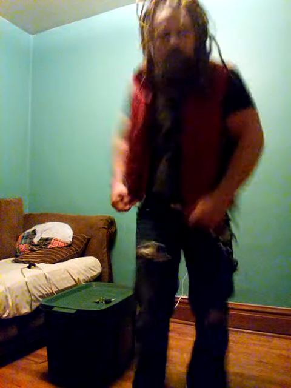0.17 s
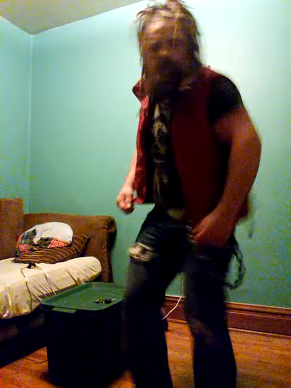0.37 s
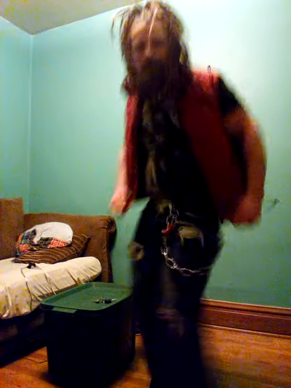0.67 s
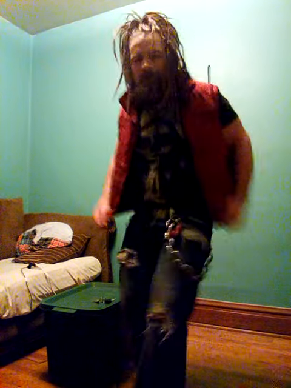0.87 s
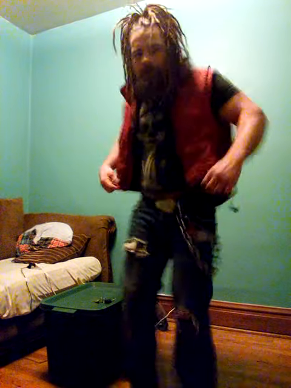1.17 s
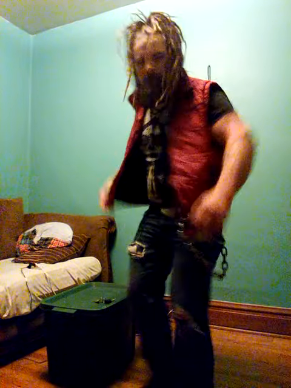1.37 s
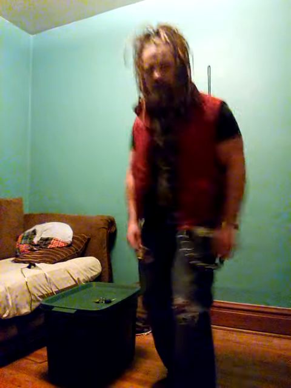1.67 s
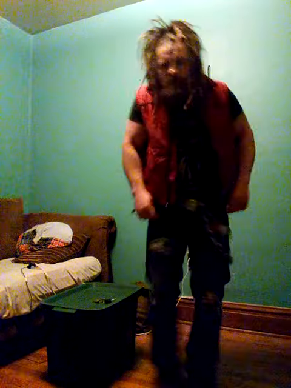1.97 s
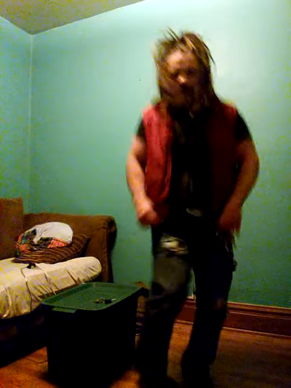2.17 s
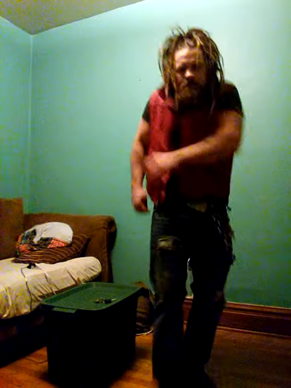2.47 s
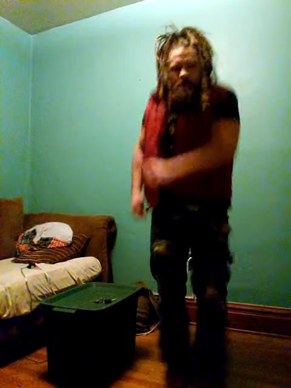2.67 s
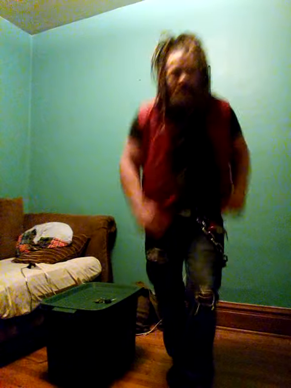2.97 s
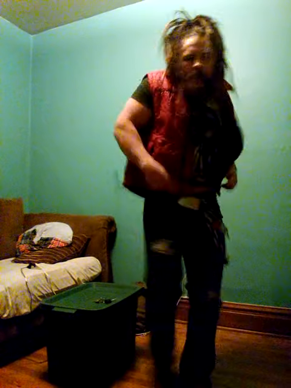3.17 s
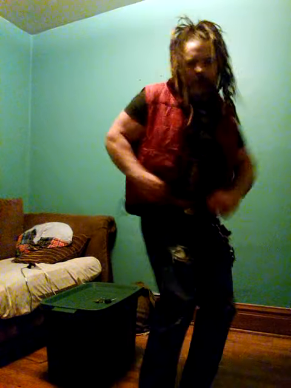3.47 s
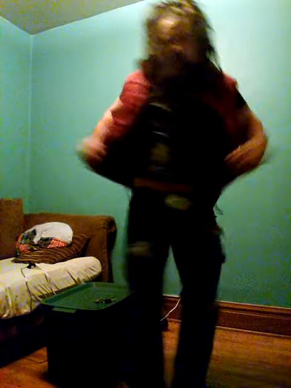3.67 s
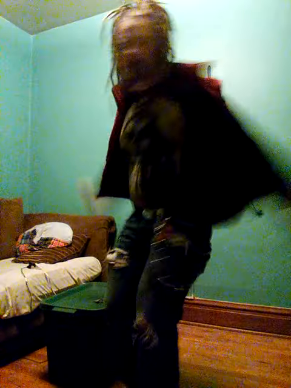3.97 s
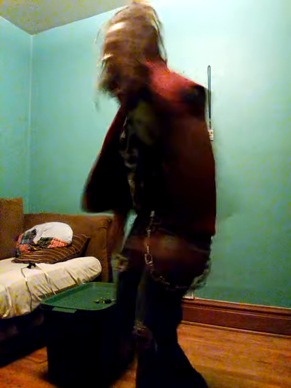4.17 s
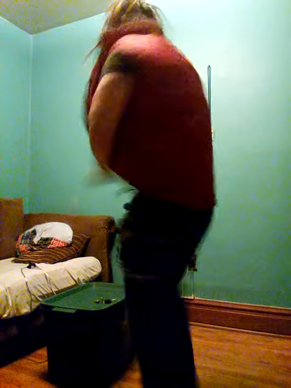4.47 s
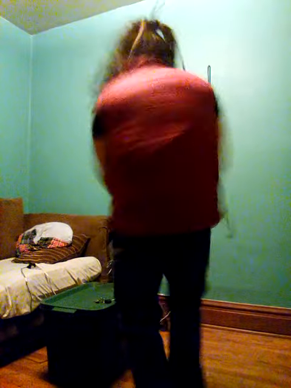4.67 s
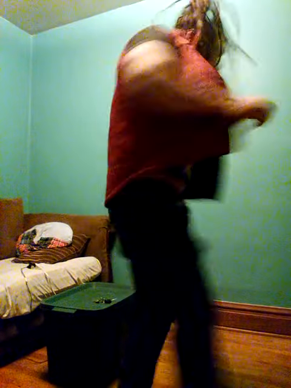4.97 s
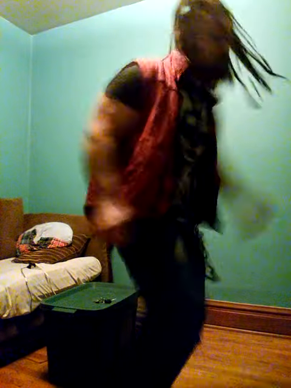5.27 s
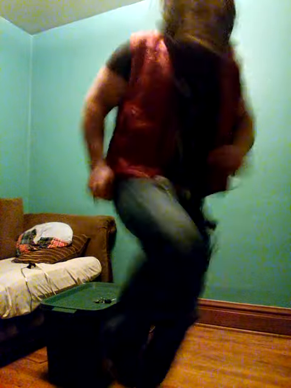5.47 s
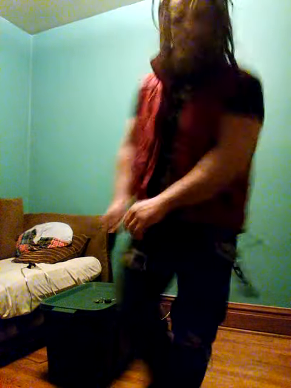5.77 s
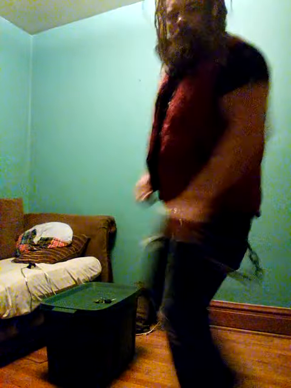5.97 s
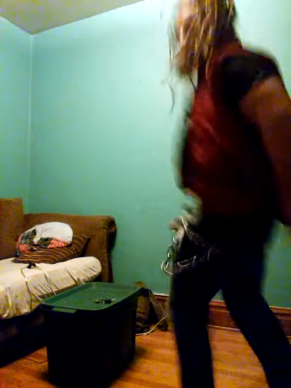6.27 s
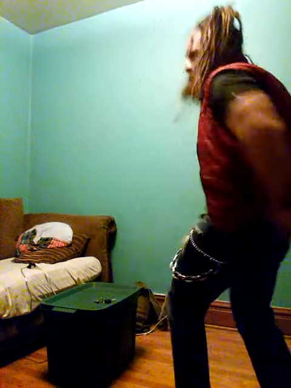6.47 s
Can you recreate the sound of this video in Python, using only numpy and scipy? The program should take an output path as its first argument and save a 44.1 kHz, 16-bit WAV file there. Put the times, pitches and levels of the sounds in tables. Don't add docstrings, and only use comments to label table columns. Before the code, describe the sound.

Quick dancing footwork on a wooden floor: dry, sandy scrapes and hisses run into one another with uneven gaps, the boards murmuring underneath. The strongest strokes come in the first half; later ones are lighter. Muffled heel bumps accompany turns, thin high metal links jingle at the hip, and brittle pebble clicks cluster at the end. Short room echo, quiet air and barely audible mains hum, picked up in stereo by a small handheld device's microphones.

```python
import sys
import numpy as np
from scipy import signal
from scipy.fft import rfft, irfft
from scipy.io import wavfile
from scipy.ndimage import uniform_filter1d

SR = 44100
rng = np.random.default_rng(int(sys.argv[2]) if len(sys.argv) > 2 else 0)


def how_loud(loudness_db):
    steps = np.asarray(loudness_db, float) / 20
    return 10 ** steps


def output_pcm(signal):
    pcm = np.clip(np.atleast_2d(signal).T, -1, 1) * 32767
    wavfile.write(sys.argv[1], SR, np.round(pcm).astype(np.int16))


N = 291942
CONTROL_STEP = 64

# f/Hz, level/dB (per Hz)
GRIT_SPECTRUM = [(600, -16.5), (1300, -6.5), (2200, -4.5), (3500, -4.5), (4800, 0), (6300, -4),
                 (7500, -14.5), (9000, -52)]
# f/Hz, level/dB (per Hz)
DUST_SPECTRUM = [(5500, -2), (7500, -1), (10000, 0.5), (14000, -5), (16000, -22)]


def rms_one(x):
    return x / np.sqrt(np.mean(x ** 2) + 1e-20)


def colour(x, spectrum):
    hz, db = np.transpose(spectrum)
    bins_hz = np.maximum(np.fft.rfftfreq(4096, 1 / SR), 1)
    log_gain = np.log(how_loud(np.interp(np.log(bins_hz), np.log(hz), db)))
    cepstrum = irfft(log_gain)
    cepstrum[1:2048] *= 2
    cepstrum[2049:] = 0
    impulse_response = irfft(np.exp(rfft(cepstrum)))[:2048]
    return signal.fftconvolve(x, impulse_response)[:N]


def unit_colour(x, spectrum):
    impulse_response = colour(np.ones(1), spectrum)
    return colour(x, spectrum) / np.sqrt(np.sum(impulse_response ** 2))


def drift(hz):
    r = np.exp(-2 * np.pi * hz / SR)
    wander = signal.lfilter([1], [1, -2 * r, r * r], rng.standard_normal(N + SR))
    return rms_one(wander[SR:])


def ring(clicks, hz, t60):
    r, w = how_loud(-60 / (t60 * SR)), 2 * np.pi * hz / SR
    return signal.lfilter([0, np.sin(w)], [1, -2 * r * np.cos(w), r * r], clicks + 1e-18)


def grains(per_s, spread_db):
    sizes = how_loud(spread_db * np.minimum(rng.exponential(1, N), 5))
    signed = sizes * rng.choice([-1, 1], N)
    return rms_one(signed * (rng.random(N) < per_s / SR))


def two_ports(shared, apart):
    short_waves = signal.butter(2, 1010, "high", fs=SR, output="sos")
    apart = 1.1 * signal.sosfilt(short_waves, apart) + .2 * np.roll(apart, SR // 50)
    return np.array([shared + apart, shared - apart])


def diffuse(catches, spectrum, t60):
    r = how_loud(-120 / (t60 * SR))
    trail = np.sqrt(signal.lfilter([1 - r], [1, -r], catches ** 2))
    fields = [unit_colour(trail * rng.standard_normal(N), spectrum) for k in range(2)]
    return two_ports(*fields) / np.sqrt(2)


def every_sample(*controls):
    return [np.interp(np.arange(N), np.arange(0, N, CONTROL_STEP), c) for c in controls]


def stroke(s, db, swell_s, sink_s, hold_s=0, last_db=None):
    lift_after_s, lift_s = .12, .14
    t = np.arange(0, N, CONTROL_STEP) / SR - s
    last_db = db if last_db is None else last_db
    held_db = np.interp(t, [0, hold_s + 1e-4], [db, last_db])
    swelling = np.minimum(t, 0) / swell_s
    sinking = np.maximum(t - hold_s, 0) / sink_s
    lifted = np.maximum(t - hold_s - lift_after_s, 0) / lift_s
    return how_loud(2 * held_db + 40 * (swelling - sinking - lifted)) + 1e-12


def slide():
    # t/s at full speed, grit level/dB, swell/s and sink/s per 20 dB, weight on boards/dB
    scuffs = [(.15, -18, .14, .08, 1), (.29, -28, .14, .24, 1), (.53, -38, .12, .3, 7),
              (.64, -38, .12, .1, 1), (.73, -19, .1, .12, -1), (1.2, -15, .09, .14, 0),
              (1.66, -17, .09, .085, 3), (2.03, -15, .08, .19, -3), (2.59, -17.5, .065, .3, 0),
              (2.86, -27, .3, .15, 11), (3.235, -32, .08, .1, -1), (3.5, -21, .11, .14, 2),
              (3.92, -20, .04, .38, -1), (4.23, -30, .2, .2, 1), (4.54, -23.5, .04, .2, 2),
              (4.98, -29.5, .075, .3, -2), (5.2, -33.5, .4, .17, 0), (5.615, -29.5, .1, .16, -1),
              (5.795, -40, .03, .12, 4), (6.06, -26, .08, .11, 3), (6.225, -37.5, .02, .16, -1),
              (6.49, -36, .15, .3, -1)]
    # start t/s, length/s, first level/dB, last level/dB, weight on boards/dB
    drags = [(0, .05, -34.5, -33, -2), (.78, .29, -27, -42, 2), (1.36, .24, -35, -28, 0),
             (1.84, .08, -55, -47, -2), (2.29, .145, -37, -27, -2), (2.68, .42, -25, -36, 0),
             (3.32, .14, -31, -27, -3), (3.68, .09, -46, -44, 10), (3.84, .08, -28, -20, -2),
             (4.455, .085, -30, -24, -2), (4.66, .16, -42, -47, 0), (5.36, .18, -41, -42, 0),
             (6.35, .08, -46, -43, -3), (6.54, .08, -42, -41, 14), (4.36, .04, -50, -50, 4)]
    drag_start_s, drag_stop_s = .03, .08
    boards_ref_db, boards_follow = -17.5, .6
    dust_ref_db, dust_follow = -22, .8
    dust_lifts_db, dust_loss = -41, 1.5
    dust_lead_s, dust_pinned = .012, .7

    moves = [(stroke(s, db, swell, sink), weight) for s, db, swell, sink, weight in scuffs]
    moves += [(stroke(s, db, drag_start_s, drag_stop_s, hold, last), weight)
              for s, hold, db, last, weight in drags]
    power = sum(move for move, weight in moves)
    grit_db = 10 * np.log10(power)
    weight_db = sum(move * weight for move, weight in moves) / power
    swing_db = grit_db + 30
    boards_db = boards_ref_db + weight_db + (boards_follow - 1) * swing_db

    slope_db_per_s = np.gradient(uniform_filter1d(grit_db, size=20)) * SR / CONTROL_STEP
    speeding_db = np.clip(dust_lead_s * slope_db_per_s, -3.0, 4.0)
    thinning_db = dust_loss * np.minimum(grit_db - dust_lifts_db, 0)
    dust_db = dust_ref_db + (dust_follow - 1) * swing_db + thinning_db + speeding_db - dust_pinned * weight_db
    return every_sample(grit_db, boards_db, dust_db)


def soles():
    # f/Hz, level/dB (per Hz)
    boards_spectrum = [(150, -14.5), (300, -10.5), (500, 1), (800, 3), (1100, -.5), (1500, -12),
                       (4000, -18), (10000, -40)]
    grit_db, boards_db, dust_db = slide()
    slip = how_loud(grit_db + 1.0 * drift(35) + 1.12 * drift(250))
    catches = grains(6000, spread_db=2.0)
    grit = slip * how_loud(-8.0) * catches
    boards_drive = rms_one(catches + 2.0 * rng.standard_normal(N))
    boards = slip * how_loud(boards_db - 1.5) * boards_drive
    dust = slip * how_loud(dust_db + 3.0) * grains(9000, spread_db=3.0)

    hiss_echoes = diffuse(grit, GRIT_SPECTRUM, 0.23) + diffuse(dust, DUST_SPECTRUM, 0.14)
    echoes = how_loud(-0.5) * hiss_echoes + how_loud(-2.5) * diffuse(boards, boards_spectrum, 0.25)
    hiss = unit_colour(grit, GRIT_SPECTRUM) + unit_colour(dust, DUST_SPECTRUM)
    return hiss, unit_colour(boards, boards_spectrum), echoes


def sway():
    # t/s, joists level/dB, whole floor level/dB
    shifts = [(0, -49, -56), (.08, -57, -49), (.27, -48, -54), (.4, -54, -55), (.6, -51, -64),
              (.77, -47, -59), (.97, -51, -53), (1.25, -47, -63), (1.5, -50, -62), (1.7, -51, -44),
              (2.04, -51, -66), (2.33, -54, -57), (2.88, -38, -63), (3.06, -46, -58), (3.2, -52, -51),
              (3.52, -47, -66), (3.72, -49, -56), (3.93, -51, -58), (4.12, -52, -53), (4.31, -49, -50),
              (4.67, -51, -58), (4.85, -58, -53), (5.14, -46, -75), (5.36, -49, -60), (5.55, -62, -49),
              (5.8, -68, -47), (6.0, -51, -50), (6.25, -48, -48), (6.38, -60, -45), (6.6, -43, -52)]
    load_s, unload_s = .13, .15
    loads = np.array([stroke(s, 0, load_s, unload_s) for s, *levels in shifts])
    powers = how_loud(2 * np.array(shifts)[:, 1:].T)
    return every_sample(*10 * np.log10(powers @ loads))


def floor_weight():
    # f/Hz, level/dB (per Hz)
    joists_spectrum = [(70, -18.5), (110, 2), (170, 7), (230, 1), (330, 3), (420, -3), (600, -28),
                       (4000, -45)]
    floor_hz, floor_t60_s = 61, 0.26
    joists_db, floor_db = sway()
    joists = rms_one(colour(rng.standard_normal(N), joists_spectrum))
    floor = ring(rng.standard_normal(N), floor_hz, floor_t60_s)
    floor = rms_one(ring(floor, floor_hz, floor_t60_s))
    return how_loud(joists_db - 4.0) * joists + how_loud(floor_db - 4.0) * floor


def still_air():
    # f/Hz, level/dB (per Hz)
    air_spectrum = [(25, -40), (42, -26), (60, -6.5), (120, 3), (250, -13), (700, -6), (1500, -9),
                    (5000, -18.5), (8000, -45), (15000, -50)]
    fields = [how_loud(-57) * rms_one(colour(rng.standard_normal(N), air_spectrum)) for k in range(2)]
    return two_ports(*fields)


def steady_hum():
    # f/Hz, level/dB (rms)
    tones = [
        (60, -79.5),
        (171, -70),
    ]
    t = np.arange(N) / SR
    return sum(np.sqrt(2) * how_loud(db + 0.83 * drift(5.6)) * np.sin(2 * np.pi * hz * t) for hz, db in tones)


def chains():
    # t/s, peak level/dB, rattle t60/s
    shakes = [(0.8969, -44, 0.2), (1.5833, -54, 0.18), (1.6965, -50, 0.15), (4.1091, -47, 0.2),
              (4.143, -49, 0.2), (4.1794, -56, 0.2), (4.2722, -39, 0.2), (4.8249, -55, 0.13),
              (5.2505, -54, 0.2), (5.2754, -51, 0.2), (5.3547, -55, 0.2), (5.4076, -33, 0.22),
              (5.4864, -39, 0.2), (5.5737, -43, 0.23), (5.6456, -51, 0.18), (5.7862, -53, 0.22),
              (5.9723, -49, 0.2), (6.2218, -37, 0.17), (6.2477, -49, 0.15), (6.3669, -47, 0.22),
              (6.3889, -40, 0.2), (6.4547, -39, 0.12)]
    # f/Hz, level/dB, t60/s
    link_modes = [(8070, -30, 0.075), (8420, -54, .1), (8980, -19, .1), (10000, -36, .06),
                  (12800, -24, .06), (14170, -4, 0.073), (14240, -1, .08), (14330, 9, .07),
                  (14700, -23, .07), (14300, 1, 0.059), (14750, -9, .05), (15150, -6, .05),
                  (15300, -4, .06), (15100, -3, .06)]
    t, shake = np.arange(N) / SR, np.zeros(N)
    for s, db, t60 in shakes:
        span = slice(round(s * SR), round(s * SR) + SR // 2)
        since = t[span] - s
        shake[span] += (1 - np.exp(-since / 0.0027)) * how_loud(db - 60 * since / t60)
    touches = shake * grains(1500, spread_db=-1.0)
    ringing = sum(how_loud(db) * ring(touches * rng.standard_normal(N), hz, 0.38 * t60)
                  for hz, db, t60 in link_modes)
    return how_loud(-27.0) * ringing + how_loud(-17.0) * colour(touches, DUST_SPECTRUM)


def far_engine():
    # t/s, f/Hz, level/dB (rms)
    glide = [
        (0.9, 77.3, -63),
        (1.55, 83.5, -54),
        (1.782, 86.2, -60),
        (2.388, 91, -59),
        (2.5, 90.1, -71),
    ]
    t = np.arange(N) / SR
    times, pitches, levels = np.transpose(glide)
    hz, db = np.interp(t, times, pitches), np.interp(t, times, levels)
    fade = np.clip(np.minimum(t - times[0], times[-1] - t) / 0.16, 0, 1)
    return np.sqrt(2) * how_loud(db) * fade * np.sin(2 * np.pi * np.cumsum(hz) / SR)


def heel_thuds():
    # t/s, peak level/dB, f/Hz, t60/s
    blows = [(1.269, -49, 264, 0.16), (1.679, -41, 70.0, 0.15), (1.997, -46, 113, 0.15),
             (2.85, -44, 480, .12), (2.87, -47, 150, 0.15), (6.53, -47, 492, .2),
             (3.039, -41.5, 168.6, 0.22), (3.539, -46, 285, 0.13), (3.747, -37, 300, 0.069),
             (3.914, -46, 56.5, 0.15), (5.378, -54, 198, 0.15), (6.269, -39.5, 153, 0.15)]
    out = np.zeros(N)
    for s, db, hz, t60 in blows:
        start = round(s * SR)
        t = np.arange(min(SR // 4, N - start)) / SR
        soft_onset = 1 - np.exp(-t / 0.017)
        out[start:start + len(t)] += how_loud(db + 6.5 - 60 * t / t60) * soft_onset * np.sin(2 * np.pi * hz * t)
    return out


def ticks():
    # t/s, peak level/dB
    snaps = [(4.461, -18), (5.7862, -27), (5.814, -26), (5.959, -33), (6.22, -21), (6.362, -32),
             (6.3824, -34), (6.3874, -24), (6.3967, -26), (6.4363, -22), (6.452, -28)]
    clicks = np.zeros(N)
    for s, db in snaps:
        clicks[round(s * SR)] = how_loud(db + 11.0)
    return colour(clicks, GRIT_SPECTRUM)


def bedroom(x):
    room_t60_s, wall_cut_hz, step_s = 0.27, 5550, .05
    t, hop = np.arange(SR // 4) / SR, round(step_s * SR)
    fade = np.sqrt(np.hanning(2 * hop))
    lasting = rng.standard_normal((2, len(t)))
    dull = signal.butter(1, wall_cut_hz, fs=SR, output="sos")
    padded = np.pad(x, (hop, 2 * hop))
    decay = how_loud(-60 * t / room_t60_s) * (t > .003)
    out = np.zeros((2, len(padded) + len(t)))
    for i in range(0, N + hop, hop):
        noise = .3 * lasting + rng.standard_normal(lasting.shape)
        tails = (signal.sosfilt(dull, noise) + noise * how_loud(-200 * t)) * decay
        tails = tails / np.sqrt(np.sum(tails ** 2))
        piece = signal.fftconvolve(tails, [fade * padded[i:i + 2 * hop]])
        out[:, i:i + piece.shape[1]] += piece
    return two_ports(*out[:, hop:hop + N])


def scene():
    port_lag = 18
    hiss, boards, echoes = soles()
    weight = floor_weight() + heel_thuds()
    small = chains() + ticks()
    near = how_loud(-3.5) * hiss + how_loud(-2.0) * small
    late = np.concatenate([np.zeros(port_lag), near[:-port_lag]])
    direct = np.array([near, late])
    reverberant = bedroom(how_loud(-2.5) * small + how_loud(-2.0) * weight)
    background = still_air() + steady_hum() + far_engine()
    return direct + echoes + reverberant + how_loud(-0.5) * (boards + weight) + background


def low_pass(x):
    return signal.sosfilt(signal.butter(12, 15620, fs=SR, output="sos"), x)


def record(dry):
    # f/Hz, level/dB
    left_response = [(60, 1.5), (160, -2.5), (450, 1.5), (1220, 1.5), (2000, 3.5), (3300, 10), (4300, 12),
                     (5100, 17), (5900, 11.5), (7200, 5.5), (9000, -2), (11000, -14.5), (15000, -14)]
    ports = np.array([colour(dry[0], left_response), dry[1]])
    return low_pass(ports)


dry = scene()
out = record(dry)
output_pcm(out)
```